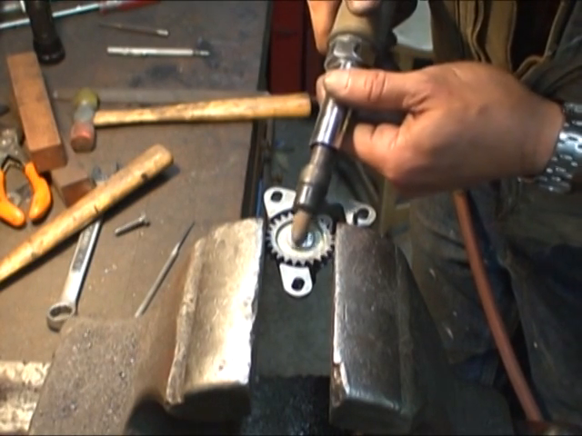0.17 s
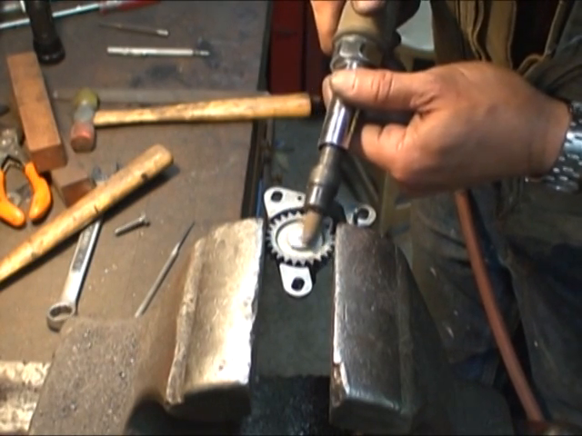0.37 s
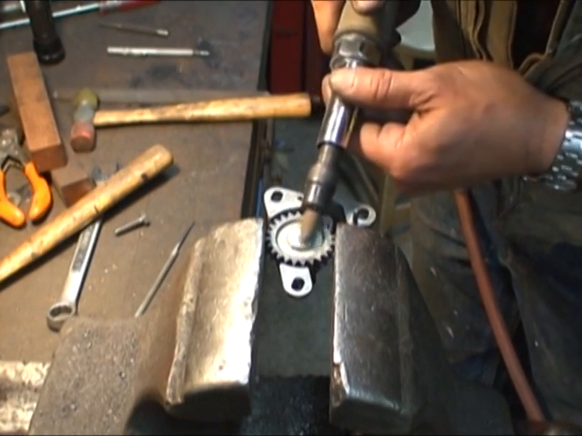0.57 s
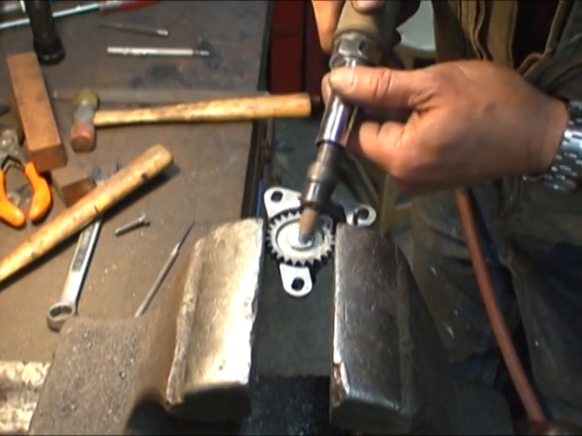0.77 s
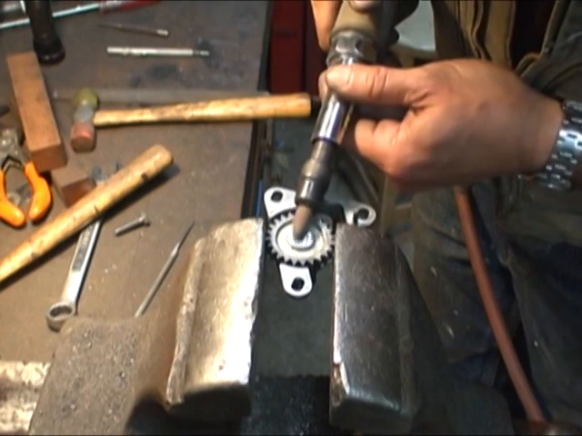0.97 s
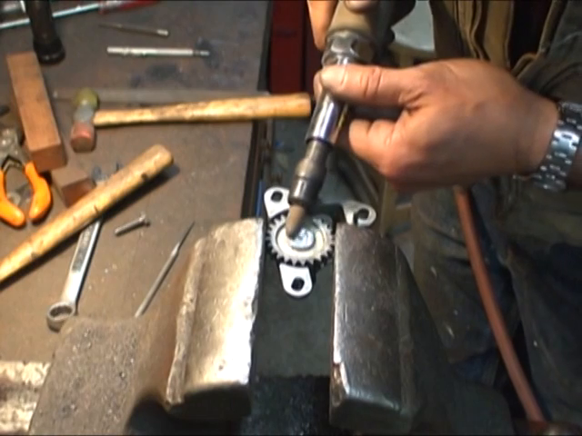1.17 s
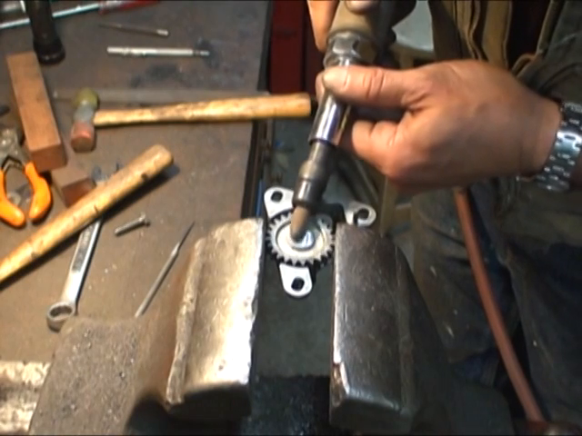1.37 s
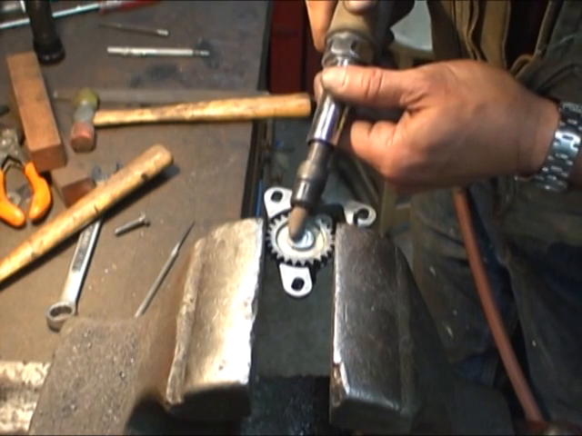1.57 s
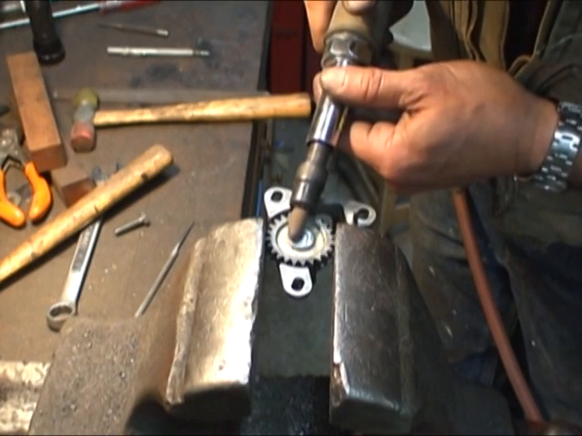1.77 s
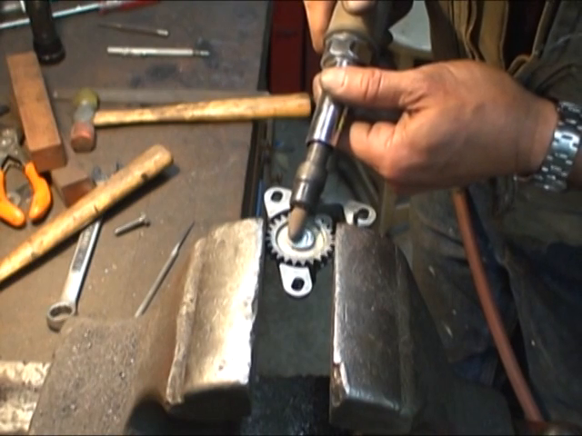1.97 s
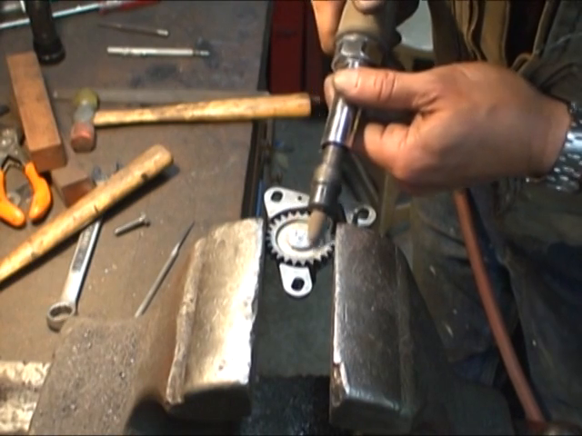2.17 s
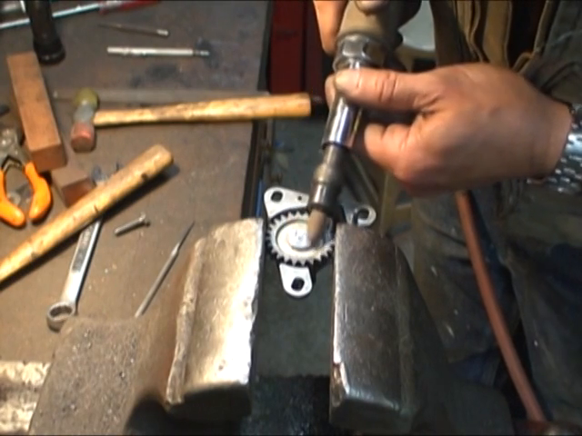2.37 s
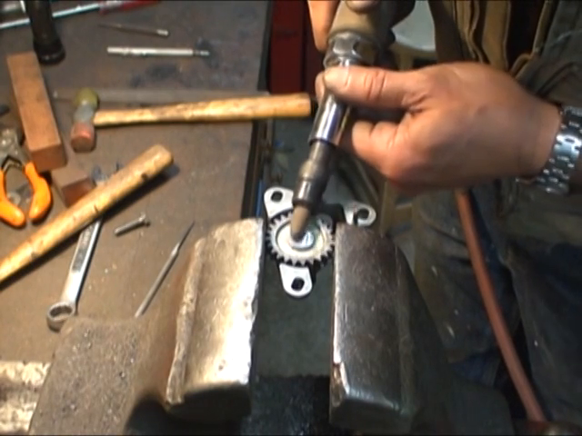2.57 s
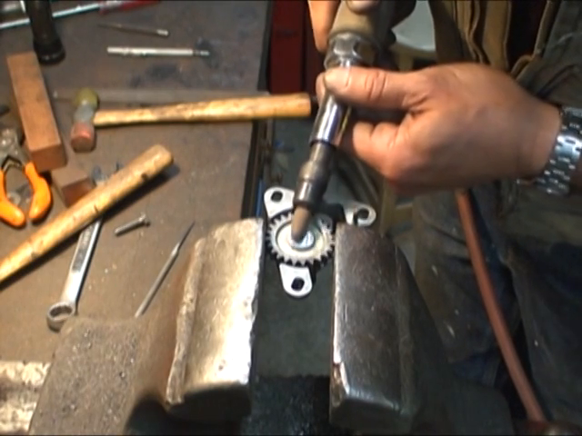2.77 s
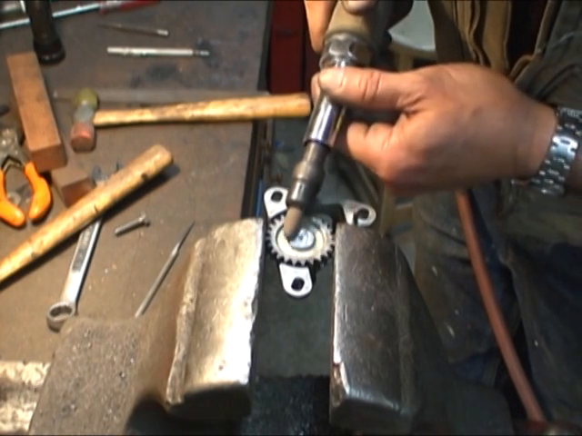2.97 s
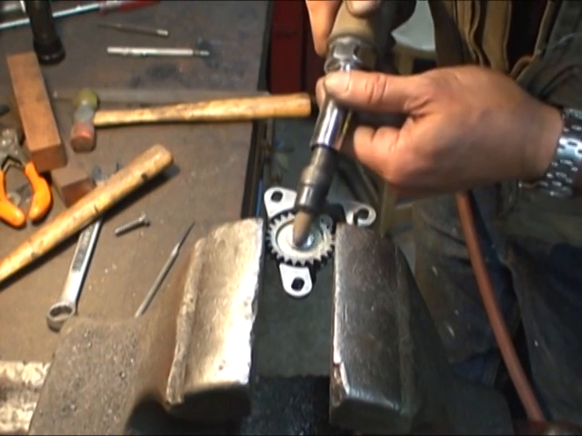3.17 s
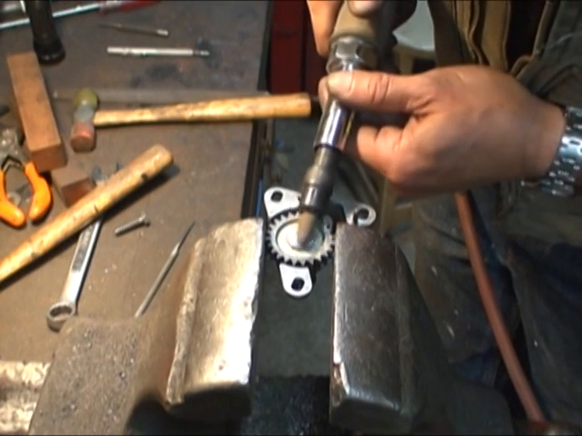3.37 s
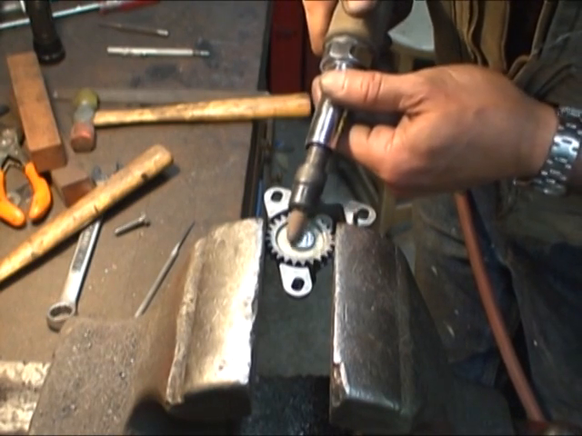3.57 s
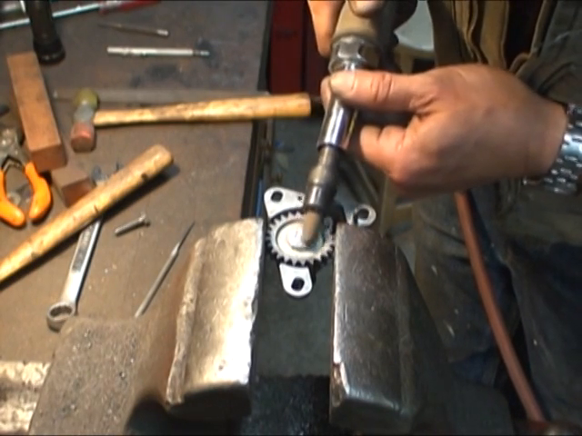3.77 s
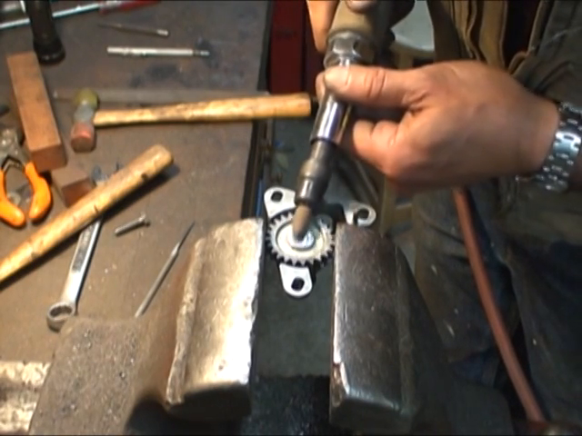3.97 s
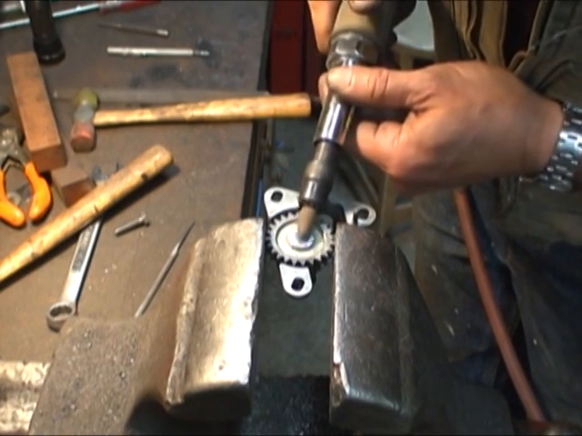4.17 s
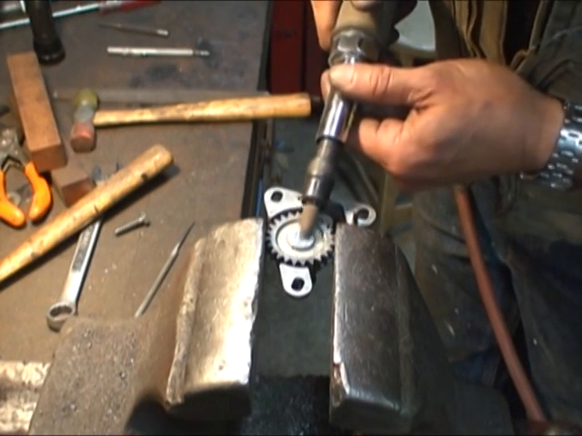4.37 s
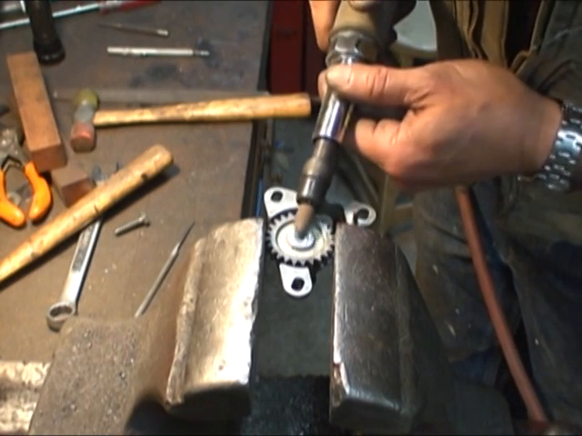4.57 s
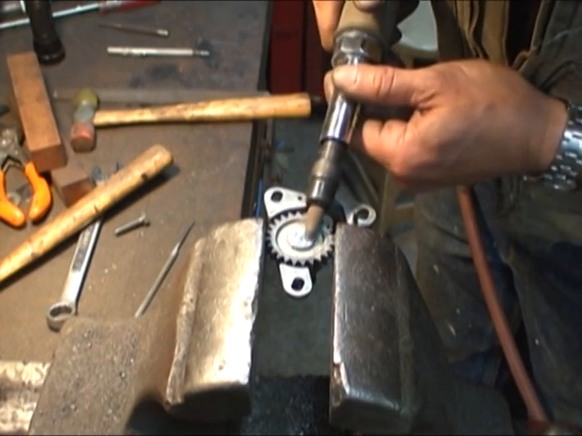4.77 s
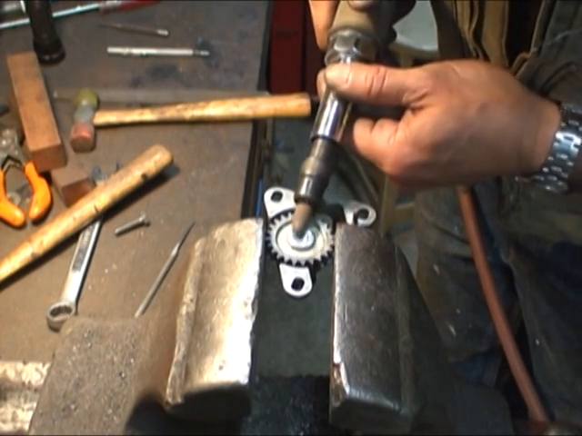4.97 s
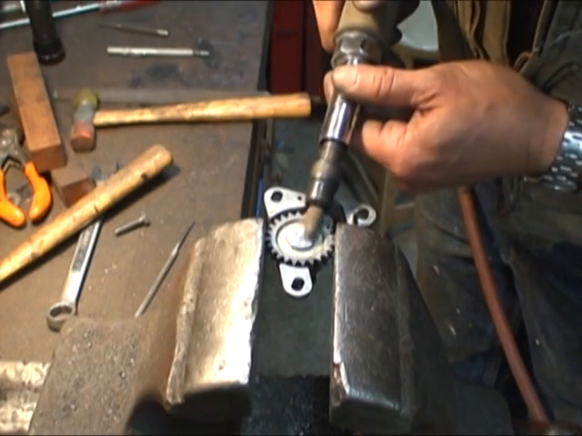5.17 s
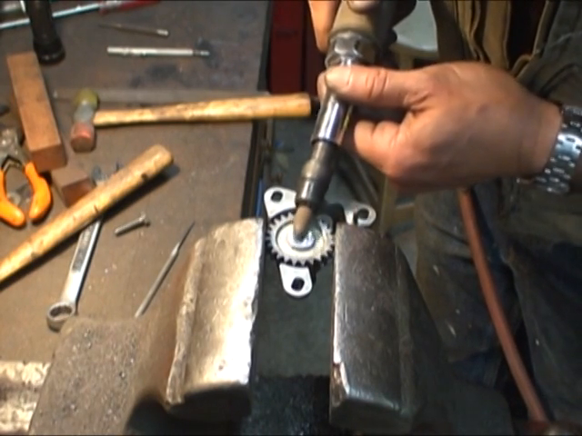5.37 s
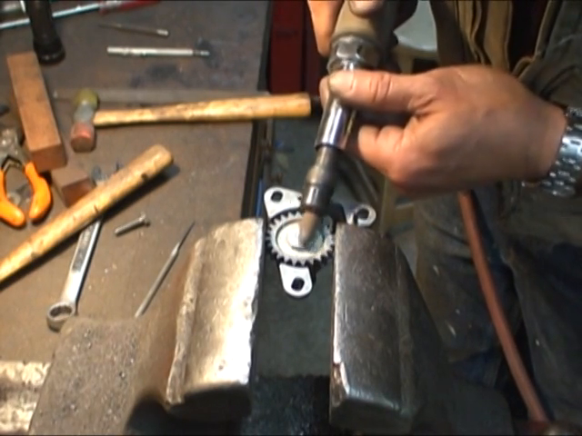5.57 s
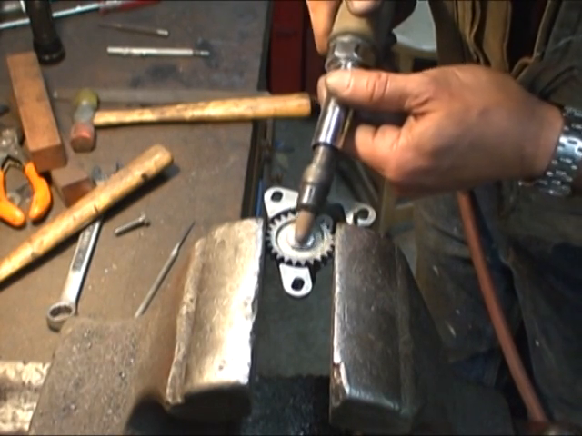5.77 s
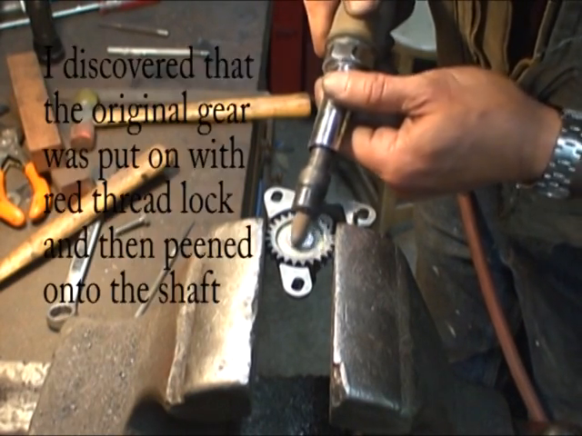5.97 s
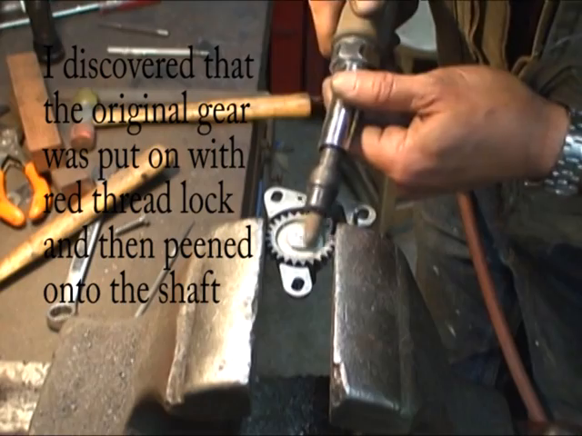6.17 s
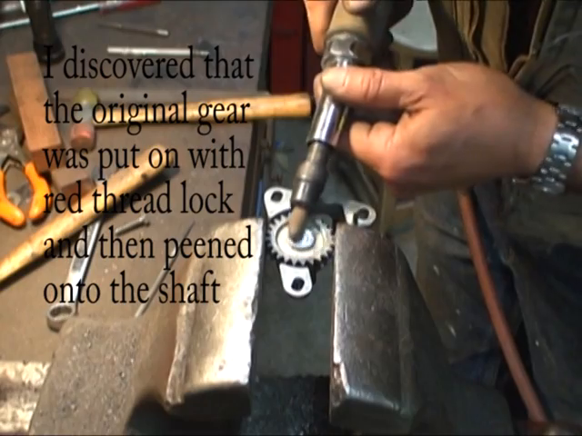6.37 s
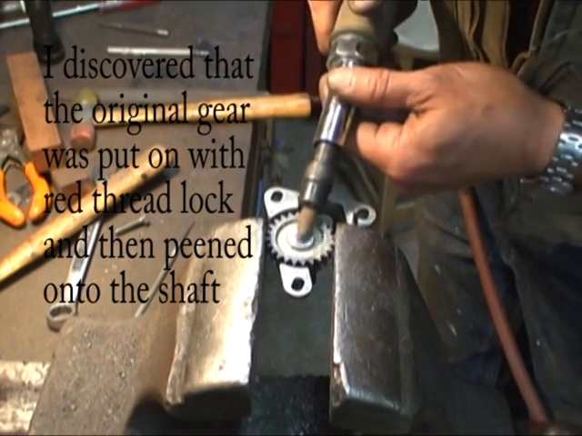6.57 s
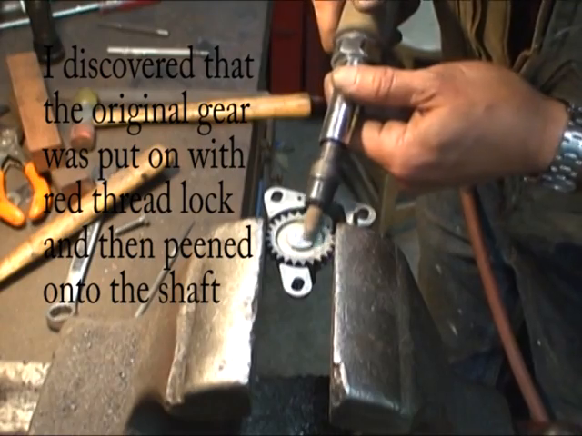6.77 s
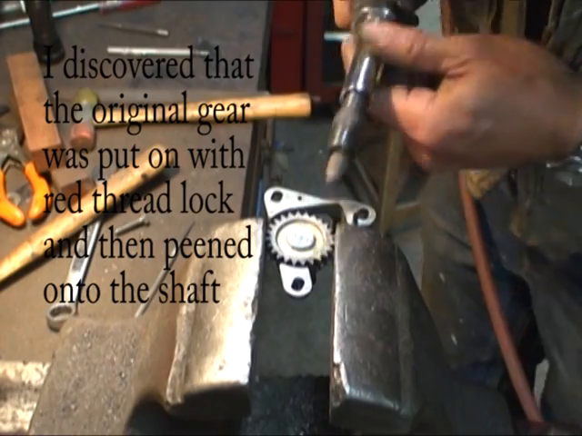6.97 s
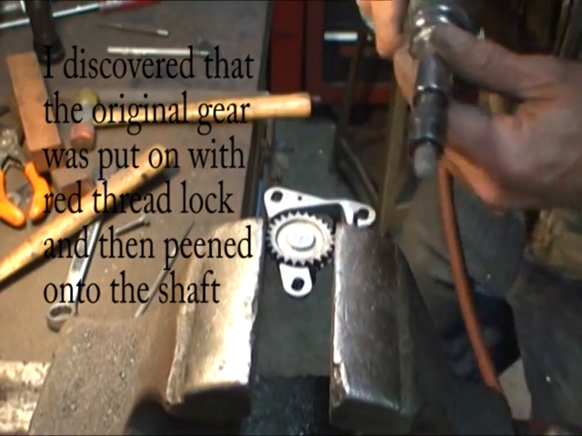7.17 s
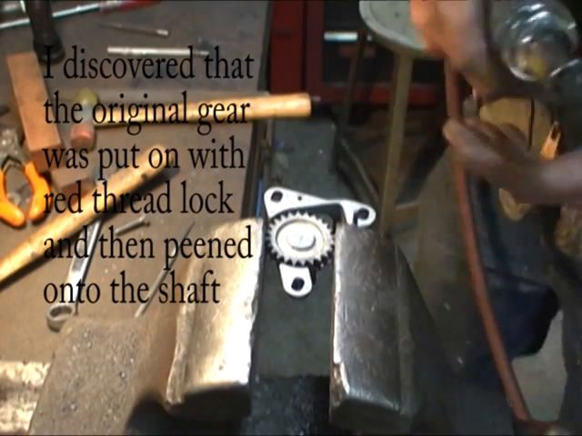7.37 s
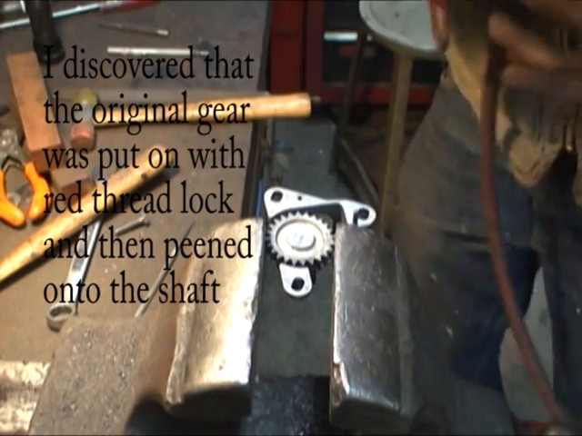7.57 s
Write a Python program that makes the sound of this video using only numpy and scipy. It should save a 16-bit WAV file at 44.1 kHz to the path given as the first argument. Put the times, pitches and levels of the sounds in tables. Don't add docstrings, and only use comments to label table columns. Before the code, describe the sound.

Close stereo pickup of a pneumatic grinder already at full speed, buzzing and hissing as its stone rasps on a metal gear. The tone rises, briefly slumps with softer air, then surges back and gradually climbs higher. It stops abruptly near the end with a fast falling pitch and draining air, followed by a sharp metallic tick, light handling clicks and quiet low room noise with short hard-walled reverberation.

```python
import sys
import numpy as np
from scipy import signal
from scipy.fft import rfft, irfft, next_fast_len
from scipy.io import wavfile
from scipy.ndimage import uniform_filter1d

SR = 44100
rng = np.random.default_rng(int(sys.argv[2]) if len(sys.argv) > 2 else 0)


def field_ratio(decibels):
    return 10 ** (np.asarray(decibels, dtype=float) / 20)


def put_to_file(sound):
    columns = np.atleast_2d(sound).T
    safe = np.clip(columns, -1, 1)
    whole_steps = np.round(safe * 32767)
    wavfile.write(sys.argv[1], SR, whole_steps.astype(np.int16))


N = 336042
VANES = 4
ROTOR_S, HAND_S = 0.0947, 0.0205
SHUT_S, SHUTTING_S = 6.89, 0.012
EDGE_HZ = 15740

# (time [s], vane rate settled to [Hz])
PUSHES = [(0.0, 869), (0.121, 798), (0.281, 830), (0.462, 777), (0.636, 811), (0.823, 786), (0.93, 817),
          (1.143, 791), (1.184, 884), (1.34, 944), (1.461, 974), (1.563, 932), (1.655, 950),
          (1.811, 884), (1.934, 928), (2.017, 894),
          (2.836, 810), (2.99, 827), (3.177, 776), (3.286, 801), (3.544, 773), (3.758, 833),
               (3.862, 768), (3.974, 831), (4.131, 812), (4.326, 856), (4.482, 846), (4.545, 828),
               (4.648, 863), (4.752, 916), (4.818, 949), (4.899, 925), (5.106, 983), (5.268, 950),
               (5.655, 895), (5.712, 970), (5.969, 943), (6.09, 965), (6.3, 952), (6.385, 972), (6.46, 958),
               (6.5, 986), (6.59, 946), (6.7, 975)]
# (time [s], vane rate settled to [Hz])
LEVER = [
    (2.131, 784),
    (2.217, 367.8),
    (2.546, 458.6),
    (2.585, 743),
    (6.835, 885),
    (6.872, 213),
]


def motor():
    moves = sorted(map(tuple, [*PUSHES, *LEVER]))
    s, settle_hz = np.transpose(moves)
    move = np.searchsorted(s, np.arange(N) / SR, "right") - 1
    hz = settle_hz[np.maximum(move, 0)] - settle_hz[0]
    for lag_s in (ROTOR_S, HAND_S):
        keep = np.exp(-1 / (lag_s * SR))
        hz = signal.lfilter([1 - keep], [1, -keep], hz)
    hz = (hz + settle_hz[0]) * (1 + 0.001483 * drift(0.02))
    return hz, np.cumsum(hz) / (SR * VANES)


def shut():
    return np.clip((np.arange(N) / SR - SHUT_S) / SHUTTING_S, 0, 1)


# (frequency [Hz], level [dB])
PORT = [(300, -39), (550, -30.5), (800, -26), (1200, -27), (1700, -30.5), (2400, -30), (3300, -28),
        (4000, -27)]
# (frequency [Hz], width [Hz], lift [dB])
HOSE = [(570, 640, 28), (840, 110, -16), (1334, 346, 22.5), (2770, 380, 36)]


def vane_tones_db(hz, flow_db):
    t = np.arange(N)[::64] / SR
    f = np.outer(np.arange(VANES) + 1, hz[::64])
    above = np.arange(VANES)[:, None]
    held_db = np.where(t > LEVER[-2][0], 1, flow_db[::64])
    fed_db = read(PORT, f) + 0.88 * housing_db(f) + standing_db(f)
    fed_db += (0.63 + 0.048 * above) * held_db
    coasting_db = -46.5 - 170 * (t - SHUT_S) + lifts_db(HOSE, f) - 2 * above
    db = fed_db + shut()[::64] * (coasting_db - fed_db)
    return np.array([np.interp(np.arange(N), np.arange(N)[::64], row) for row in db])


def whine(hz, turns, tones_db):
    slope = np.gradient(uniform_filter1d(np.log(hz), 2000))
    glide = np.minimum(abs(slope) * SR / 2.5, 1)
    depth_db = 0.9 + 3 * glide
    chance = np.repeat(wander(0.007, len(tones_db)), 64, axis=1)[:, :N]
    flutter_db = depth_db * np.minimum(uniform_filter1d(chance, size=128), 0.8)
    out = np.zeros(N)
    for k, db in enumerate(tones_db + flutter_db, 1):
        out += field_ratio(db) * np.cos(2 * np.pi * (VANES * k * turns + rng.random()))
    return np.sqrt(2) * out


# (frequency [Hz], level [dB])
EDGES = [(1000, -39), (2200, -36.5), (4000, -34.5), (4700, -40.5), (5600, -45.5), (8000, -33), (15700, -70)]


def vane_edges(hz, turns, flow_db):
    multiples = list(range(5 * VANES, 26 * VANES, VANES))
    f = np.outer(multiples, hz[::64]) / VANES
    sharp_db = -0.9 - 14 * shut()
    db = read(EDGES, f) + 1.3 * housing_db(f) + sharp_db[::64]
    db += 2.8 * np.minimum(f / 6000, 1) * wander(0.019, len(f))
    db[:2] += standing_db(f[:2])
    db -= 2.0 * np.arange(len(f))[:, None]
    db += (0.77 + 0.51 * np.clip(f / 3000 - 1, 0, 1)) * flow_db[::64]
    return orders(multiples, turns, np.where(f < EDGE_HZ, db, -200))


# (frequency [Hz], level [dB])
TURN = [(100, -68), (205, -41), (250, -42), (420, -48), (700, -53), (1400, -54), (2200, -50), (4000, -45.5),
        (7000, -52.5), (10000, -49), (15800, -75)]
WOBBLE_DB = [-48.5, -49]


def shaft_orders(hz, turns, flow_db):
    multiples = [k for k in range(1, 64) if k % VANES]
    f = np.outer(multiples, hz[::64]) / VANES
    db = read(TURN, f) + 0.42 * standing_db(f) + 1.0 + housing_db(f) + 0.83 * flow_db[::64]
    db += 2.6 * wander(0.05, len(f))
    db[1::VANES - 1] += 2.5
    wobble_db = np.c_[WOBBLE_DB] + standing_db(f[:2]) + flow_db[::64] + wander(0.16, 2)
    db[:2] = wobble_db - 0.31 * np.maximum(150 - f[:2], 0)
    return orders(multiples, turns, db)


# (frequency [Hz], density [dB per Hz])
JET = [(35, -66), (60, -51), (216, -33), (267, -22.5), (397, -15.5), (919, -19), (1810, -12), (2750, -2.5),
       (3550, -5.5), (5530, -2), (7150, -5.5), (9910, -1.5), (15800, -8.5)]


def exhaust(turns, air_db, flow_db):
    puffs = 0.5 + 0.13 * np.exp(-(VANES * turns % 1) / 0.52) + 0.5 * np.exp(-(turns % 1) / 0.17)
    gusts = field_ratio(1.2 * drift(0.021))
    spits = field_ratio(1.9 * np.minimum(rng.exponential(1, N), 3.5))
    spits *= (rng.random(N) < 500 / SR) * rng.choice([-1, 1], N)
    drive = evened(puffs * gusts * rng.standard_normal(N)) + 0.12 * evened(spits)
    jet = coloured(drive, JET, pipes=0.4)
    leak = signal.oaconvolve(jet, signal.firwin(21, 13900, pass_zero=False, fs=SR), "same")
    leak_db = -11 - 0.38 * flow_db
    return field_ratio(air_db - 0.02) * (jet + (field_ratio(leak_db + 12.0) - 1) * leak)


# (frequency [Hz], density [dB per Hz])
RASP = [(100, -8), (300, 1), (800, -1), (2000, -15.5), (3000, -18), (5000, -17), (9000, 17), (15800, 0)]
# (time [s], length [s], lift [dB])
SKIDS = [
    (.3, .5, -7),
    (1.34, .12, 15),
    (1.56, .06, 16),
    (1.85, .4, 9),
    (2.06, .1, 9),
    (4.7, .8, 3),
    (6.2, 1.2, 8),
]


def stone(turns, flow_db):
    contact_db = -41.5 + lifts_db(SKIDS, np.arange(N) / SR) + drift(0.15)
    bite = 0.41 + np.exp(-(turns % 1) / 0.15)
    return field_ratio(contact_db + flow_db) * coloured(bite * rng.standard_normal(N), RASP)


# (time [s], level [dB])
DRAIN = [
    (6.86, -74),
    (6.9, -32),
    (7.0, -36),
    (7.1, -77),
    (7.2, -71),
    (7.3, -64),
    (7.34, -72),
    (7.4, -95),
]


def drain():
    hz = np.fft.rfftfreq(N, 1 / SR)
    ring = sum(field_ratio(db) / (1 + (2 * (hz - f) / width) ** 2)
               for f, width, db in [(2900, 65, 6), (5366, 150, -9.0), (1374, 130, -2)])
    return field_ratio(curves(DRAIN)[0]) * evened(irfft(rfft(rng.standard_normal(N)) * ring, N))


# (time [s], peak [dB], frequency [Hz], t60 [s])
TICKS = [(7.1475, -39, 6450, .03), (7.1537, -21, 12400, .006), (7.1533, -30, 6910, 0.013),
         (7.1543, -24, 12000, 0.011), (7.1568, -38, 11500, .03), (7.171, -40, 11500, .02),
         (7.343, -45, 1810, 0.022), (7.3425, -47, 4000, .015), (7.418, -40, 3120, 0.018),
         (7.425, -37, 3870, .025), (7.426, -43, 8500, 0.014), (7.553, -45, 7800, .015),
         (7.556, -51, 4230, 0.013)]
# (time [s], level [dB])
SLIDE = [
    (7.337, -90),
    (7.341, -55),
    (7.39, -50),
    (7.43, -56),
    (7.47, -76),
    (7.5, -90),
]


def handling():
    out, t = np.zeros(N), np.arange(1500) / SR
    for s, db, hz, t60 in TICKS:
        band = signal.butter(2, [0.87 * hz, 1.14 * hz], "bandpass", fs=SR, output="sos")
        tick = signal.sosfilt(band, field_ratio(-60 * t / t60) * rng.standard_normal(1500))
        out[round(s * SR):][:1500] += field_ratio(db) * tick / abs(tick).max()
    skin = [(50, -50), (200, -4), (1500, -6), (4000, -9), (7000, -13), (9000, -16), (15800, -16)]
    return out + field_ratio(curves(SLIDE)[0]) * coloured(rng.standard_normal(N), skin)


# (frequency [Hz], width [Hz], lift [dB])
PIPES = [(1378, 153, 8), (2600, 59, 10.5), (2812, 410, 11.5), (5680, 780, 7.5), (10020, 210, 9),
         (12000, 1200, -4), (12900, 880, 12.5), (14500, 570, 22)]


def housing_db(hz):
    return lifts_db(PIPES, hz)


# (frequency [Hz], width [Hz], lift [dB])
STANDING_WAVES = [(209.5, 11.3, 9), (240, 4.7, -10), (406, 20, 6), (502, 27, -9.5), (550.5, 60, 2.5), (650, 14, -30),
                  (791.5, 41, -9.5), (824.6, 65, 4.5), (968.6, 20.3, -6.5), (1110, 34, -3.5), (1206, 36, -7),
                  (2180, 17, 0), (2180, 22, -10),
                  (811.5, 16, -9), (909, 23.5, -13), (1601, 23, -9.5), (1651, 8.3, 5), (1726, 7.2, -8),
         (1878, 41, -9.5), (1924, 8.44, -5.5), (2417, 26, -8.5), (2468, 27, -12), (2574, 79, -25),
         (2715, 33, -12), (2872.6, 19.7, -11.5), (3700, 20, -1), (3774, 27, -14),
                  (1623.5, 53, 7.5), (1916, 66, 6.5), (2300, 70, 0.5), (2420, 37, 6), (2765, 32, 5), (2807, 17, -7),
          (3063, 59, -15), (3470, 79, 3.5), (3854, 140, 3), (3880, 35, -13), (4072, 290, 5.5),
          (4220, 25, -2), (4500, 250, -0.5), (4820, 46, 5)]


def standing_db(hz):
    return lifts_db(STANDING_WAVES, hz)


# (frequency [Hz], t60 [s])
WALLS = [(100, 0.042), (1000, 0.56), (3000, 0.38), (8000, 0.49), (16000, 0.063)]


def shop(x):
    taps = np.zeros((2, SR // 2))
    at = np.arange(40, SR // 2 - 20, 20) + rng.integers(0, 20, (2, (SR // 2 - 41) // 20))
    np.put_along_axis(taps, at, rng.choice([-1., 1.], at.shape), 1)
    hz, t, z = signal.stft(taps, SR, nperseg=256)
    tail = signal.istft(z * field_ratio(-60 * t / read(WALLS, hz)[:, None]), SR, nperseg=256)[1]
    tail = tail / np.linalg.norm(tail, axis=1, keepdims=True)
    return signal.fftconvolve(x[None], tail, axes=1)[:, :N]


# (frequency [Hz], left minus right [dB])
LEAN = [(60, -3), (150, 4.5), (380, -7), (950, 4), (2380, -3.5), (5980, -1), (15000, -0.5)]


def ports(mid, side):
    size = next_fast_len(N + 8192)
    hz = np.fft.rfftfreq(size, 1 / SR)
    skew = sum(np.sin(2 * np.pi * (hz * s + rng.random())) for s in (.0011, .0023, .0041, .0067))
    lean = field_ratio(read(LEAN, hz) / 2) * np.exp(1j * 0.26 * skew)
    left = irfft(rfft(mid + side, size) * lean, size)
    right = irfft(rfft(mid - side, size) / lean, size)
    return np.array([left, right])[:, :N]


# (frequency [Hz], density [dB per Hz])
SHOP = [(24, -58), (40, -13), (85, -10), (151, -3), (255, -4), (1090, -11), (2190, -18), (2740, -21),
        (12300, -21.5), (15800, -29)]


def background(flow_db):
    spectrum = SHOP[:-1] + [(15800, -26)]
    a, b, c = (coloured(v, spectrum) for v in rng.standard_normal((3, N)))
    low = [(20, -15.5), (60, 2), (130, -6), (180, -22)]
    rumble = field_ratio(0.6 * flow_db - 81) * np.array([coloured(v, low) for v in (b, c)])
    return rumble + field_ratio(-56) * np.array([a + 0.5 * b, a + 0.5 * c])


def orders(multiples, turns, db):
    fine, out = np.arange(N), np.zeros(N)
    turns = (turns % 1).astype(np.float32)
    for k, gain in zip(multiples, field_ratio(db)):
        phase = np.float32(2 * np.pi) * (k * turns + np.float32(rng.random()))
        out += np.interp(fine, fine[::64], gain) * np.cos(phase)
    return np.sqrt(2) * out


def evened(x):
    return x / np.sqrt(np.mean(x ** 2) + 1e-20)


def read(points, hz):
    f, value = np.transpose(points)
    return np.interp(np.log(hz + 1), np.log(f + 1), value)


def curves(rows):
    s, *columns = np.transpose(rows)
    return [np.interp(np.arange(N) / SR, s, c) for c in columns]


def lifts_db(rows, hz):
    return sum(db / (1 + (2 * (hz - f) / width) ** 2) for f, width, db in rows)


def coloured(x, points, pipes=0):
    hz = np.fft.rfftfreq(N, 1 / SR)
    edge = hz < points[-1][0]
    gain = edge * field_ratio(read(points, hz) + pipes * housing_db(hz))
    return evened(irfft(rfft(x) * gain, N))


def wander(seconds, count):
    size = max(round(seconds * SR / 64), 1)
    x = rng.standard_normal((N // 64 + 1, count))
    return evened(uniform_filter1d(uniform_filter1d(x, size, 0), size, 0)).T


def drift(seconds):
    return np.repeat(wander(seconds, 1)[0], 64)[:N]


# (time [s], level [dB])
AIR = [(0.0, -23), (0.43, -23.5), (0.72, -22.5), (1.13, -25), (2.12, -23.5), (2.304, -38.5), (2.53, -36.5),
       (2.664, -24.5), (2.95, -26.5), (3.38, -25), (6.85, -23), (6.92, -36.5), (6.998, -42), (7.125, -55),
       (7.27, -67), (7.33, -74), (7.42, -88)]


def scene():
    hz, turns = motor()
    air_db = curves(AIR)[0]
    flow_db = air_db + 22.5
    clean = whine(hz, turns, vane_tones_db(hz, flow_db))
    rest = vane_edges(hz, turns, flow_db) + shaft_orders(hz, turns, flow_db)
    rest += exhaust(turns, air_db, flow_db) + stone(turns, flow_db) + drain() + handling()
    common, apart = shop(rest + 0.48 * clean)
    tool = ports(clean + rest + field_ratio(-8.5) * common, field_ratio(-12.0) * apart)
    return tool + background(flow_db)


def roll_off(x):
    return signal.sosfilt(signal.butter(12, 16980, fs=SR, output="sos"), x)


def record(dry):
    left, right = 0.83 * np.tanh(dry / 0.77)
    limit = signal.firwin(511, EDGE_HZ, window=("kaiser", 9), fs=SR)
    mid = signal.oaconvolve((left + right) / 2, limit, "same")
    low, full = (signal.firwin(255, hz, fs=SR) for hz in (11500, 14400))
    side = signal.oaconvolve((left - right) / 2, low + field_ratio(-11) * (full - low), "same")
    return roll_off(np.array([mid + side, mid - side]))


dry = scene()
out = record(dry)
put_to_file(out)
```